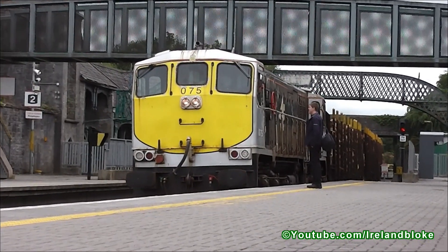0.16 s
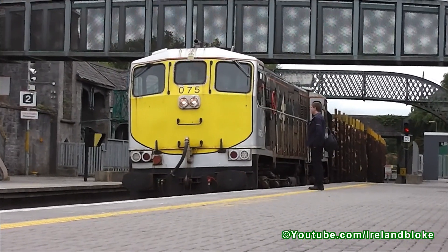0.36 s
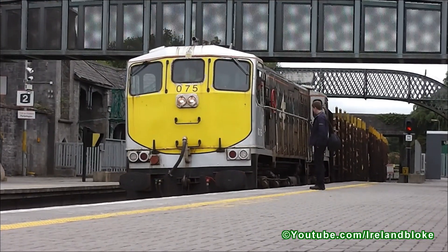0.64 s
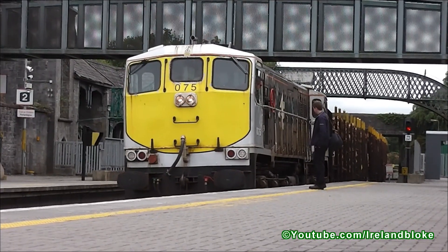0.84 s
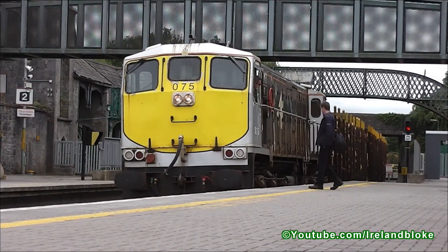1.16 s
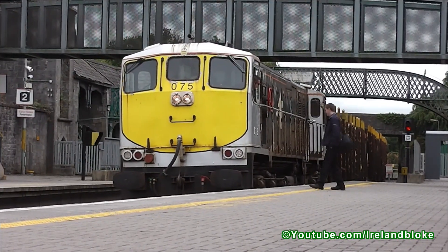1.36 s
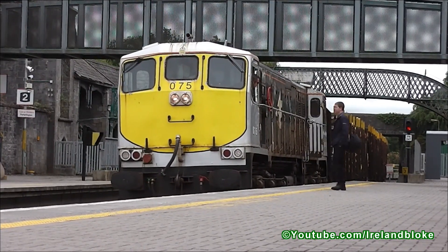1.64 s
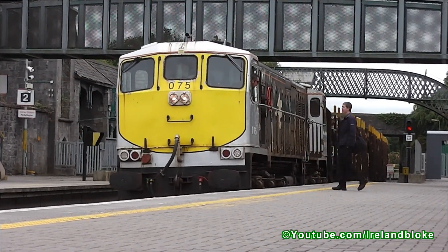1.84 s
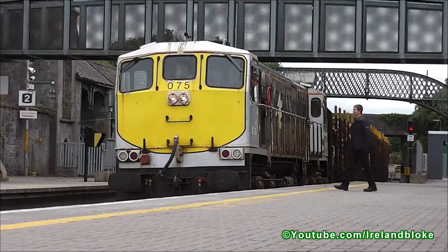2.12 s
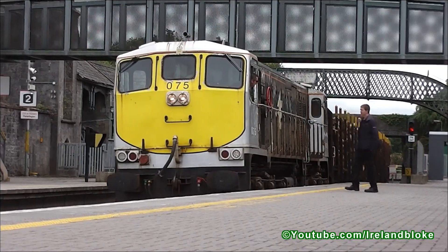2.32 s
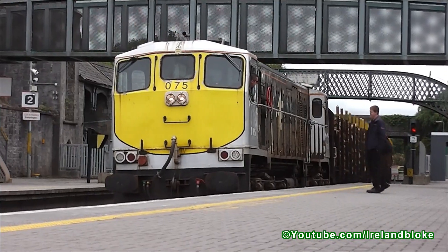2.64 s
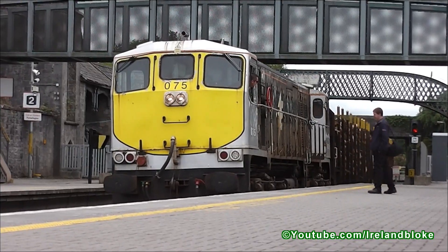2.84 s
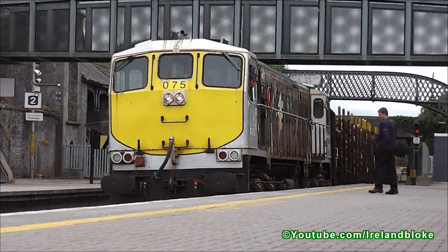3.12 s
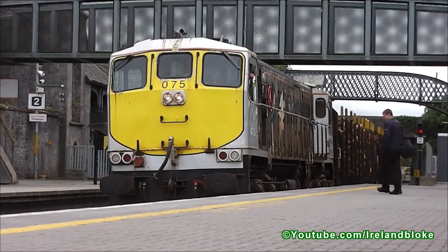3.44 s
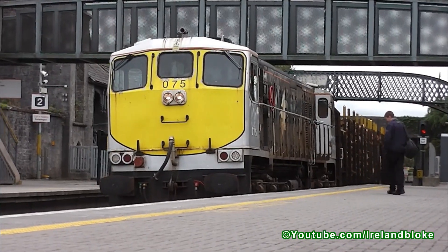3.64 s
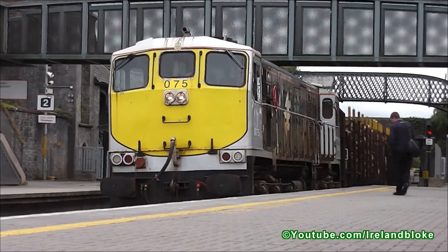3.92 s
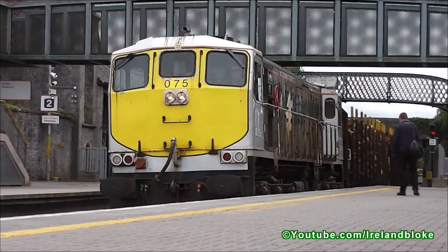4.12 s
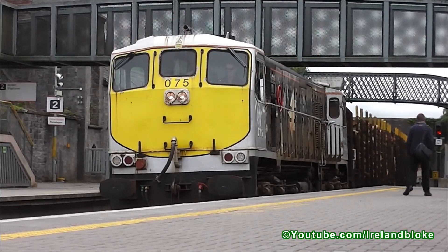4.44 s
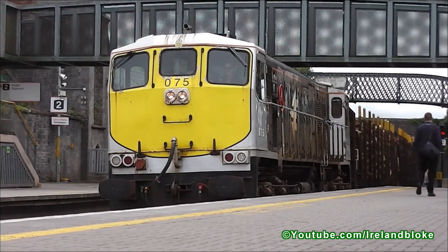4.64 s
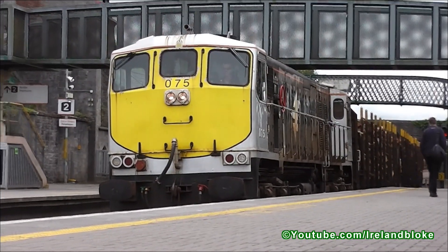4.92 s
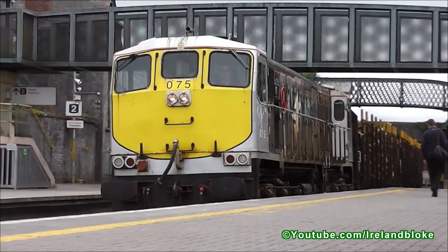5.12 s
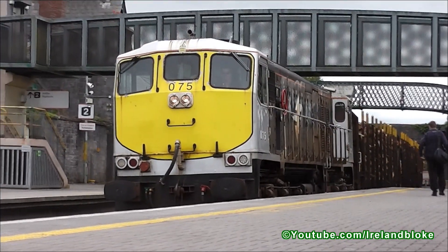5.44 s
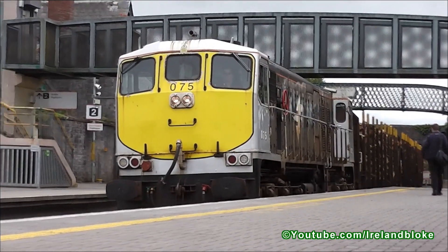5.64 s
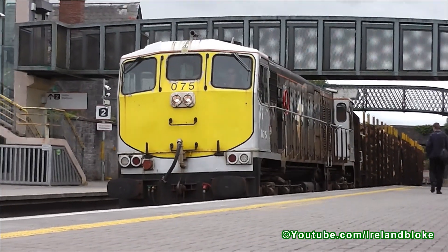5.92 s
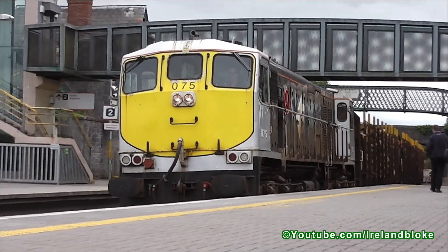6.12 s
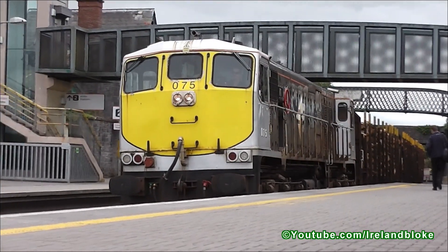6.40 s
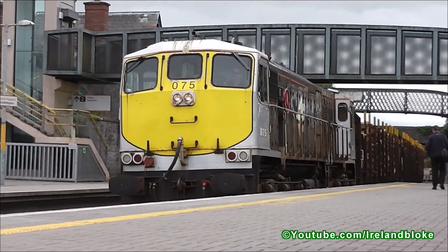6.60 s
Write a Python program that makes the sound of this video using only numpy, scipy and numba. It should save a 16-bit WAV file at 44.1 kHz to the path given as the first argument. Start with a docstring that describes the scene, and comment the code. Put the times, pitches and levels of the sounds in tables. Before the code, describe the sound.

A heavy diesel locomotive throbs and roars loudly at steady speed close by, with gear whine, airy turbo whistle and a late broken brake squeak.

```python
"""A railway platform: a twelve-cylinder two-stroke diesel locomotive pulls away slowly, engine at a steady speed.
Low harmonics of the turn rate beat once a turn; shaped noise gives a broad roar and a hiss, and a nearly
periodic rattle the clatter. Wavering sines make gear whine, and with narrow noise the thin whistles; a
turbocharger whistles as narrow noise with short bursts, and a brake squeak is a sine in short, broken stretches.
The camera's gain control ducks at loud beats and creeps back."""
import sys
import numpy as np
from scipy.fft import rfft, irfft, next_fast_len
from scipy.io import wavfile
from scipy.ndimage import uniform_filter1d, map_coordinates
from numba import njit

SR = 44100
rng = np.random.default_rng(int(sys.argv[2]) if len(sys.argv) > 2 else 0)


def wav_record(signal):
    """Record a signal, one row per channel, as 16-bit PCM in the file named by sys.argv[1]."""
    frames = np.transpose(np.atleast_2d(signal))
    bounded = np.clip(frames, -1, 1)
    # unit amplitude maps onto the largest positive 16-bit level
    quanta = np.round(bounded * 32767).astype(np.int16)
    wavfile.write(sys.argv[1], SR, quanta)


N = 298557
T = np.arange(N) / SR  # time/s

TURNS = 9.535  # crankshaft turns a second
BEAT_S = 0.01044  # first moment of the strongest firing/s
# Exhaust orders, whose paths past the walls change as the stack moves:
# [multiple of turn rate, first level/dB, last level/dB, first lead on the beat/ms, last lead/ms]
EXHAUST = [(4, -50, -59, 25, 0), (5, -33, -45, 0, -0.5), (6, -19, -21.5, 3, -1.5), (7, -29.5, -27, 4, 6.5),
           (8, -26.5, -23, -0.5, -3.3), (9, -18.5, -15, 0.5, -1.5), (10, -38, -35, -1, 4),
           (11, -31.5, -16.5, 2.5, 3), (12, -21, -19.5, -0.16, 3), (13, -23, -15.5, -1, 0.42),
           (14, -26.5, -29.5, -0.9, 0.66), (15, -34, -33.5, 1, 3.5), (16, -52, -32.5, -0.5, -0.5),
           (18, -30.5, -37.5, -0.34, 4.5)]
# Exhaust orders that swell and sink again: [multiple of turn rate]
BOOM_ORDERS = (6, 9)
# Their swell: [t/s, level added to the first such order/dB, to the second/dB]
BOOM = [(0, -8, 0), (1.8, 0.5, 0.1), (3, 4, 3.4), (3.7, 2.5, 2.5), (4.7, 1, -2.5), (5.4, -2.5, 1.5),
        (6, 1.5, -14), (6.77, -7, 0.5)]
# Broad noise: [t/s, bass roar level/dB, upper roar level/dB, level of the hiss of fans and air/dB]
NOISE_LEVELS = [(0, -19.5, -20, -36.5), (.75, -20.5, -21, -33.5), (1.5, -21, -22, -35),
                (2.25, -22, -21, -35.5), (3, -22, -23.5, -37.5), (3.75, -21, -23, -35.5),
                (4.5, -21.5, -24, -36.5), (5.25, -22, -22.5, -34), (6, -19, -25.5, -36.5),
                (6.77, -20.5, -24.5, -36.5)]
# Spectral shape of the roar: [f/Hz, relative level per Hz/dB]
ROAR_SPECTRUM = [(28, -31), (60, -25), (120, -3.5), (180, -16), (240, 1), (290, -6.5), (330, -18.5),
                 (385, -7.5), (460, -4), (600, -14.5), (800, -8), (950, -17.5), (1500, -19.5), (2400, -32),
                 (3300, -63)]
DIVIDE_HZ = 330  # the valley between bass and upper roar
# Spectral shape of the hiss: [f/Hz, relative level per Hz/dB]
HISS_SPECTRUM = [(880, -64), (1500, -5.5), (1690, -5), (2200, -13), (2910, -12.5), (4220, -12),
                 (4890, -8.5), (5340, -11.5), (7230, -11.5), (8050, -10), (8700, -17.5), (11000, -22),
                 (15500, -36.5)]
# Left-right correlation of the noise: [f/Hz, likeness 0-1]
ALIKE = [(60, 0.97), (150, 1), (300, 1), (600, 0.98), (1000, 0.86), (2400, 0.88), (5000, 0.64),
         (8000, 0.62), (15000, 0.15)]
# Orders that stand out of the clatter: [multiple of turn rate, level/dB]
KNOCK = [(21, -35.5), (24, -29), (25, -28), (26, -31), (28, -33), (30, -36), (40, -35.5), (48, -27),
         (49, -33.5), (50, -37.5), (54, -37), (58, -35), (60, -42)]
# Change of the clatter's level: [first/dB, last/dB]
CLATTER_CHANGE = (0.45, -1.3)
# Gear mesh rates: [f/Hz for each gear]
GEAR_HZ = (753, 1077.2, 1127.6)
# Gear whine, a row for each mesh: [first level/dB, last level/dB, added on the left and taken on the right/dB]
GEARS = [(-28.5, -20.5, 0), (-35.5, -30.5, 1.3), (-36, -46.5, 2)]
# Depth of the slow random swings of each gear line: [first/dB, last/dB]
GEAR_SWAY = (3.5, 1)
# A worn mesh, a narrow band of noise: [f/Hz, width/Hz, first level/dB, last level/dB]
ROUGH_GEAR = (1507, 24, -35, -41.5)
# Pitches of the thin whistles: [f/Hz for each whistle]
WHISTLE_HZ = (3763, 4810, 4973)
# Thin whistles, a row for each pitch: [noise width/Hz, first level/dB, last level/dB]
WHISTLES = [(84, -52, -52.5), (46, -54, -46), (31.481, -47, -51)]
WHISTLE_SWAY_DB = 1.5
TURBO_HZ, TURBO_WIDTH_HZ = 7965, 225
# Turbocharger whistle: [first level/dB, last level/dB]
TURBO = (-37.5, -41)
# Short bursts of the turbocharger whistle: [t/s, rms level at the top/dB]
CHIRPS = [(.2039, -34), (.5142, -29), (.7322, -41), (.8165, -25), (1.4167, -34), (2.2862, -34),
          (2.808, -32), (5.0, -31), (5.1297, -29), (5.9244, -32)]
SQUEAK_HZ = 3867
# Brake squeak, in short stretches: [start t/s, length/s, level/dB]
SQUEAK = [(5.986, .018, -41), (6.03, .02, -44), (6.057, 0.047, -38), (6.11, 0.023, -37),
          (6.142, 0.019, -40), (6.18, 0.02, -41), (6.228, .012, -42), (6.274, 0.028, -49),
          (6.304, .03, -40.5), (6.362, 0.026, -46), (6.402, .028, -40.5), (6.436, 0.02, -43),
          (6.472, .018, -43), (6.497, 0.016, -41), (6.62, .03, -47), (6.668, .014, -44)]
# Start of the faint steady squeak beneath the stretches: [t/s, level/dB]
RUB = (5.95, -52.5)
# Fainter steady lines: [f/Hz, level/dB, width/Hz]
FAINT = [(1888, -50, 4.4), (2156, -53.5, 7.4), (2204, -52.5, 7.9)]
# Creep of the locomotive from its first place to its last: [t/s, share 0-1]
CREEP = [(0, 0.05), (3, 0.21), (4.3, 0.85), (6.77, 0.98)]
# Microphone balance: [f/Hz, left minus right level/dB]
LEAN = [(60, .65), (150, .5), (300, -.1), (500, .3), (1000, .9), (2000, 0), (4000, -3.2), (8000, -4.3),
        (12000, -1)]
TOP_HZ = 15640  # upper band limit


def exhaust(crank):
    """Superposition of harmonics: low orders of the turn rate peak nearly together at the strongest firing."""
    boom_db = dict(zip(BOOM_ORDERS, curves(BOOM)))
    out = np.zeros((2, N))
    for order, first_db, last_db, first_ms, last_ms in EXHAUST:
        order = round(order)
        apart_ms = 0.13 * rng.normal() * np.array([[1], [-1]])  # opposite shifts at the two microphone ports
        lead = 2 * np.pi * TURNS * (creeping(first_ms, last_ms) + apart_ms) / 1000
        level_db = creeping(first_db, last_db) + boom_db.get(order, 0) + .05 * order * wobble(5)
        phase = order * (crank + lead + .01 * wobble(4))
        out += amp(level_db) * np.sqrt(2) * np.cos(phase)
    return out


def roar_and_hiss(crank):
    """Amplitude modulation: combustion noise swells late in each turn, in ragged bursts the hiss shares weakly."""
    bass_db, upper_db, hiss_db = curves(NOISE_LEVELS)
    swell = np.cos(crank + 2.0)
    ragged = wobble(45)
    surge_db = .9 * wobble(8)
    bass = amp(bass_db) * rush(lambda hz: amp(along(ROAR_SPECTRUM, hz)) * (hz < DIVIDE_HZ))
    upper = amp(upper_db) * rush(lambda hz: amp(along(ROAR_SPECTRUM, hz)) * (hz >= DIVIDE_HZ))
    body = amp(0.94 * swell + 1.6 * ragged + surge_db) * (bass + upper)
    hiss_level = amp(hiss_db + 1.1 * ragged + 0.48 * surge_db)
    return body + hiss_level * rush(lambda hz: amp(along(HISS_SPECTRUM, hz)))


def clatter(crank, size=4096, count=5):
    """Near periodicity: valves and pistons repeat a rattle every turn, drifting from pattern to pattern."""
    order = np.arange(size // 2 + 1)
    level = amp(along(ROAR_SPECTRUM, order * TURNS)) * (order > 16) * (order < 260)
    level *= amp(-22.0) / np.linalg.norm(level)
    for knock_order, db in KNOCK:
        level[round(knock_order)] = amp(db)
    alike = np.clip(along(ALIKE, order * TURNS), 0, 1)
    spread = np.where(order < 32, .8, 1)  # the lower orders keep partly in step with the beat
    common = spread * rng.uniform(-np.pi, np.pi, (count, 1, len(order)))
    apart = np.sqrt(1 - alike) * rng.standard_normal((count, 2, len(order)))
    patterns = irfft(level * np.exp(1j * (common + apart)), size) * size / np.sqrt(2)
    place = (crank + 0.017 * wobble(4)) / (2 * np.pi) % 1 * size  # position in the turn, in table steps
    share = amp(5.1 * np.array([wobble(2.56) for _ in patterns]))
    share /= np.sqrt(np.sum(share ** 2, axis=0))  # squared shares sum to 1

    def play(pattern):
        return np.array([np.interp(place, np.arange(size), side, period=size) for side in pattern])

    mixed = sum(s * play(pattern) for s, pattern in zip(share, patterns))
    return amp(creeping(*CLATTER_CHANGE)) * mixed


def gear_whine():
    """Periodic tooth contact: gears mesh at fixed rates and flutter with the load."""
    out = np.zeros((2, N))
    for hz, (first_db, last_db, pan_db) in zip(GEAR_HZ, GEARS):
        flutter_db = 1.8 * wobble(45) + creeping(*GEAR_SWAY) * wobble(4)
        level = amp(creeping(first_db, last_db) + flutter_db)
        out += level * tone(hz, rough=0.65) * amp([[pan_db], [-pan_db]])
    hz, width, first_db, last_db = ROUGH_GEAR
    return out + amp(creeping(first_db, last_db)) * rush(narrow(hz, width))


def turbocharger():
    """Narrow-band noise: the whistle is a fluctuating resonance, with short bursts of a rough sine."""
    steady = amp(creeping(*TURBO) + 1.65 * wobble(30)) * rush(narrow(TURBO_HZ, TURBO_WIDTH_HZ))
    # each burst tops 3 ms after its listed time
    burst = sum(amp(db) * np.exp(-np.abs(T - start - .003) / 0.0051) for start, db in CHIRPS)
    return steady + burst * tone(TURBO_HZ, rough=2.6) * amp([[-1.5], [1.5]])


def thin_whistles():
    """Partial coherence: each thin whistle joins a wavering sine to narrow noise at its pitch."""
    out = np.zeros((2, N))
    for hz, (width, first_db, last_db) in zip(WHISTLE_HZ, WHISTLES):
        level = amp(creeping(first_db, last_db) + WHISTLE_SWAY_DB * wobble(3.08))
        out += level * unit(0.68 * tone(hz, rough=1.2) + rush(narrow(hz, width)))
    return out


def brake_squeak():
    """Amplitude gating of a wavering sine: a brake squeak heard in short, broken stretches."""
    envelope = np.zeros(N)
    for start, length, db in SQUEAK:
        inside = np.minimum(T - start, start + length - T)  # time from the nearer edge/s
        envelope += amp(db) * np.clip(inside / 0.0071 + 0.4, 0, 1)
    rub_s, rub_db = RUB
    envelope += amp(rub_db) * (T > rub_s)
    return envelope * amp(1.3 * wobble(73)) * tone(SQUEAK_HZ, rough=1.5)


def faint_lines():
    """Selective filtering: steady noise in narrow bands gives faint, blurred pitches."""
    return sum(amp(db) * rush(narrow(hz, width)) for hz, db, width in FAINT)


def amp(db):
    """Logarithmic level: decibels become an amplitude ratio."""
    return 10 ** (np.asarray(db) / 20)


def unit(x):
    """Normalisation: scale to rms 1."""
    return x / np.sqrt(np.mean(x ** 2) + 1e-20)


def along(points, hz):
    """Interpolation of (f/Hz, value) points on a logarithmic frequency axis."""
    f, v = np.transpose(points)
    return np.interp(np.log(hz + 1), np.log(f + 1), v)


def curves(rows):
    """Linear interpolation in time: one curve for each column after t/s."""
    s, *columns = np.transpose(rows)
    return [np.interp(T, s, column) for column in columns]


def creeping(first, last):
    """Slow displacement: a value moves from first to last as the locomotive creeps on."""
    return first + (last - first) * curves(CREEP)[0]


def wobble(rate):
    """Random modulation: straight lines join Gaussian knots, rate knots a second."""
    knots = rng.standard_normal(int(N * rate / SR) + 4)
    return map_coordinates(knots, [T * rate], order=1)


def filtered(x, response):
    """Linear filtering: the spectrum is multiplied by a response of frequency."""
    m = next_fast_len(N + 8192)
    return irfft(rfft(x, m) * response(np.fft.rfftfreq(m, 1 / SR)), m)[..., :N]


def rush(gain):
    """Partly correlated stereo noise: mid and side power set the likeness; total rms is 1."""
    def mid_side_gain(hz):
        angle = np.arccos(np.clip(along(ALIKE, hz), 0, 1)) / 2
        return gain(hz) * [np.cos(angle), np.sin(angle)]

    mid, side = filtered(rng.standard_normal((2, N)), mid_side_gain)
    return unit(np.array([mid + side, mid - side]))


def narrow(centre_hz, width_hz):
    """Resonance: the gain falls to half amplitude at half the width from the centre."""
    return lambda hz: 1 / (1 + (2 * (hz - centre_hz) / width_hz) ** 2)


def tone(hz, rough):
    """Phase modulation: a sine of rms 1 whose phase strays a little."""
    return np.sqrt(2) * np.sin(2 * np.pi * hz * T + rough * wobble(8.6))


def scene():
    """Linear superposition: all sources add, the engine's sharing one crank angle."""
    crank = 2 * np.pi * TURNS * (T - BEAT_S)
    engine = exhaust(crank) + roar_and_hiss(crank) + clatter(crank)
    return engine + gear_whine() + turbocharger() + thin_whistles() + brake_squeak() + faint_lines()


@njit
def duck(peak, top, rise, fall):
    """Feedback gain control: gain falls while the output is over top, and otherwise climbs back to 1."""
    gain, g = np.empty_like(peak), 1.
    for i in range(len(peak)):
        g = g * fall if peak[i] * g > top else min(1., g * rise)
        gain[i] = g
    return gain


def record(dry):
    """Transduction: microphone lean, gain control, soft ceiling and band limit in series."""
    x = amp(5) * filtered(dry, lambda hz: amp(np.outer([.5, -.5], along(LEAN, hz))))
    recover_db, fall_db = 34, -5000  # dB per second
    gain = duck(np.abs(x).max(axis=0), 0.85, amp(recover_db / SR), amp(fall_db / SR))
    x = x * uniform_filter1d(gain, size=31)
    x = x / (1 + np.abs(x) ** 10) ** .1  # soft ceiling at 1
    return filtered(x, lambda hz: hz < TOP_HZ)


dry = scene()
out = record(dry)
wav_record(out)
```